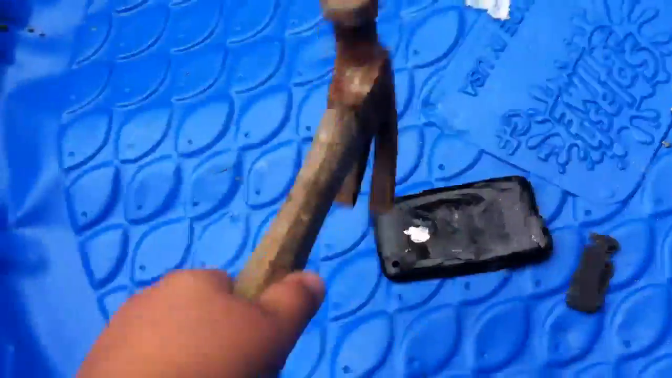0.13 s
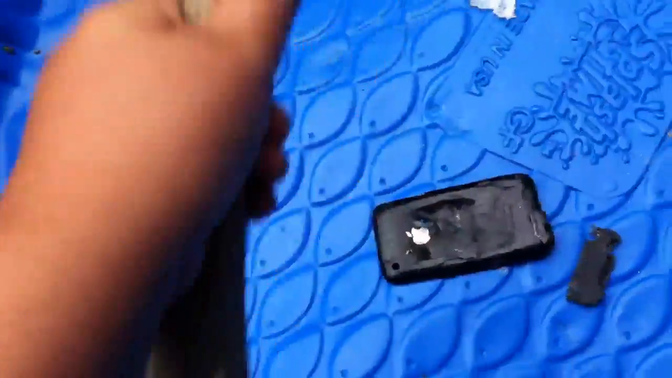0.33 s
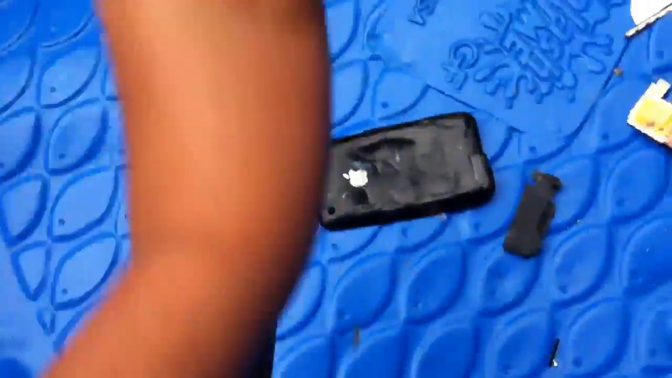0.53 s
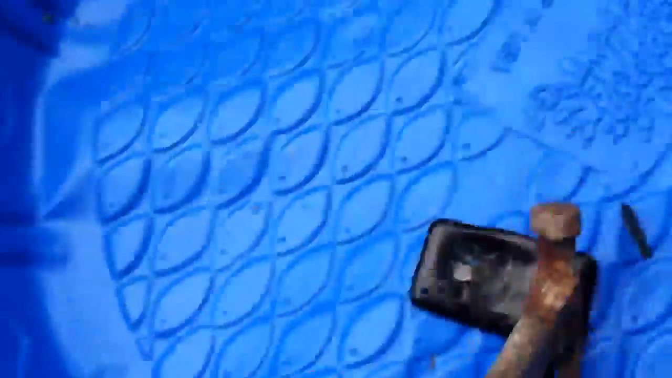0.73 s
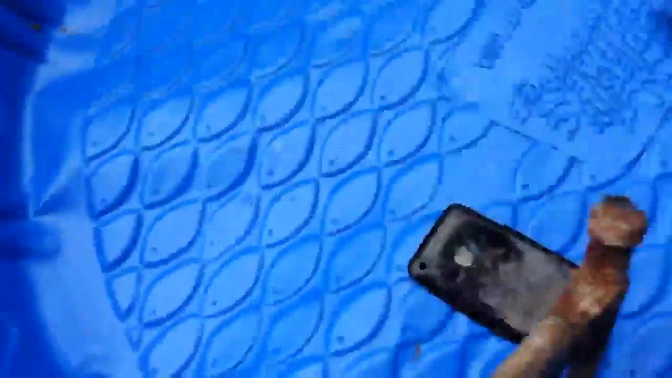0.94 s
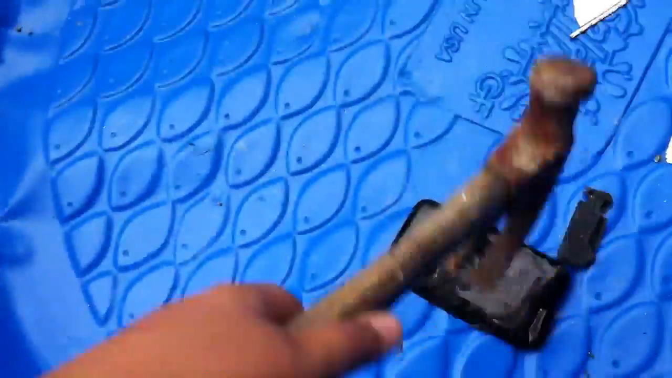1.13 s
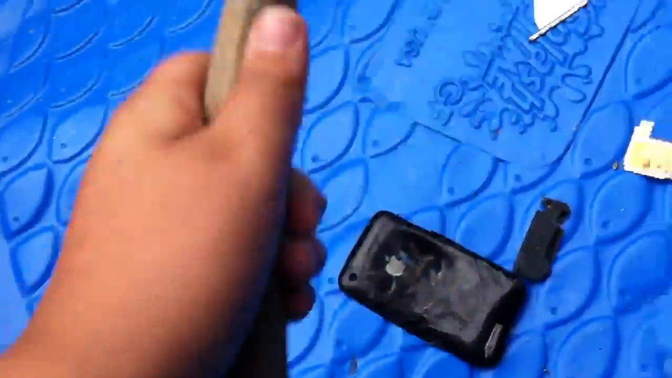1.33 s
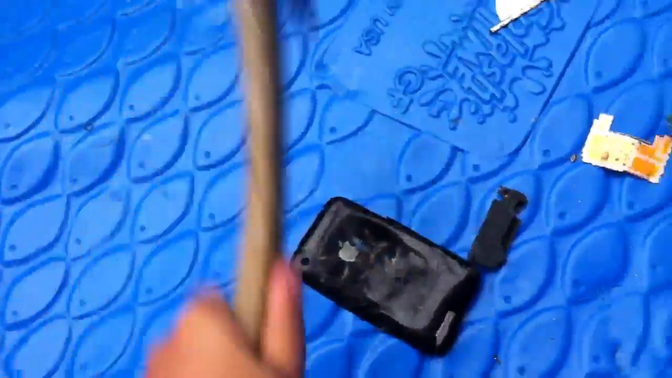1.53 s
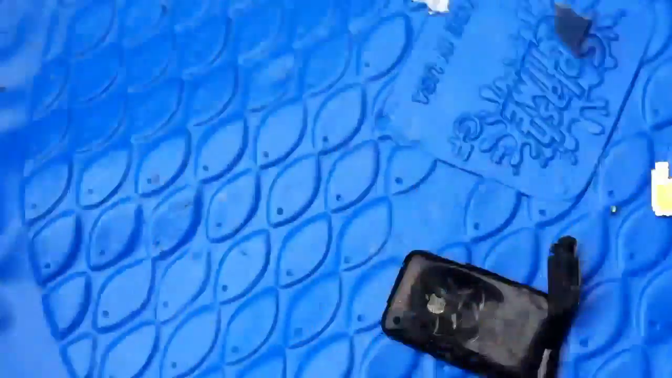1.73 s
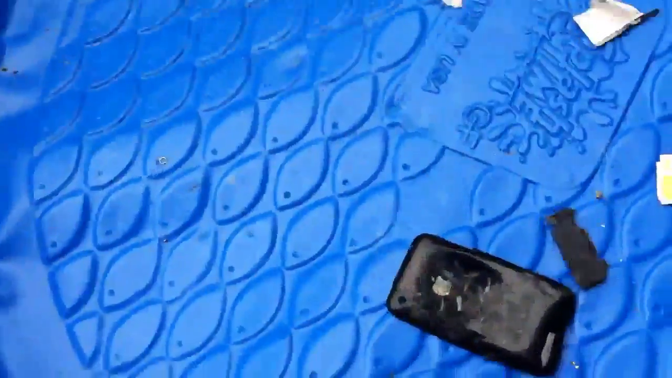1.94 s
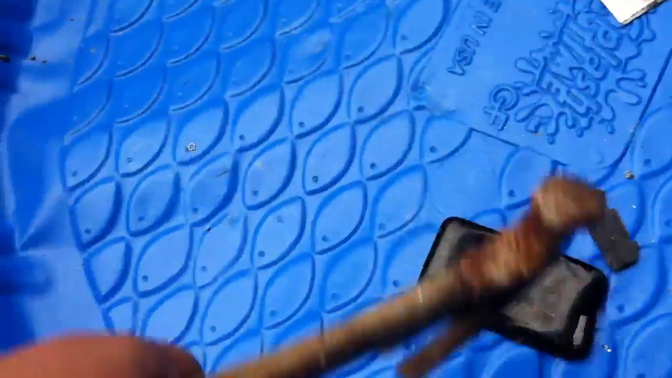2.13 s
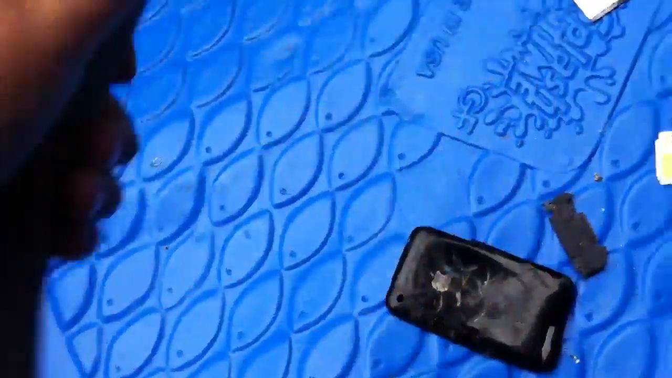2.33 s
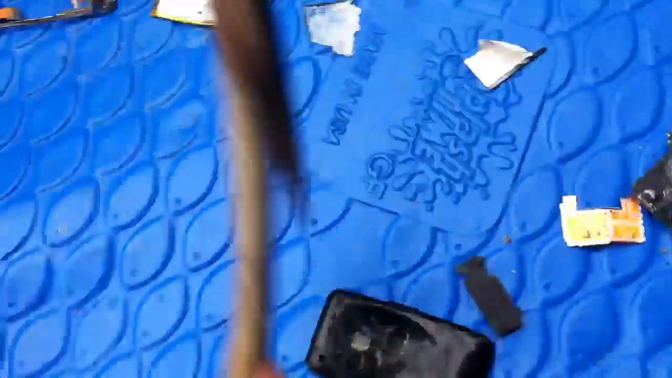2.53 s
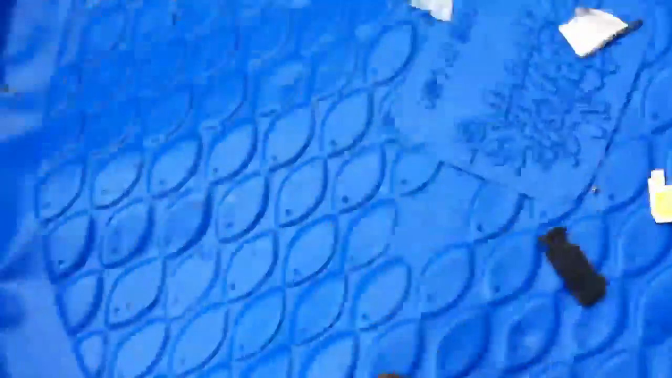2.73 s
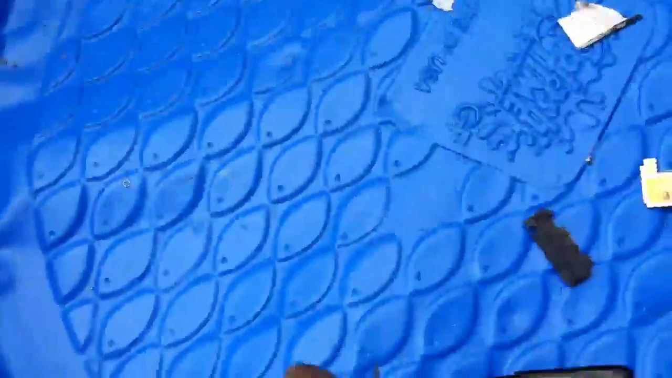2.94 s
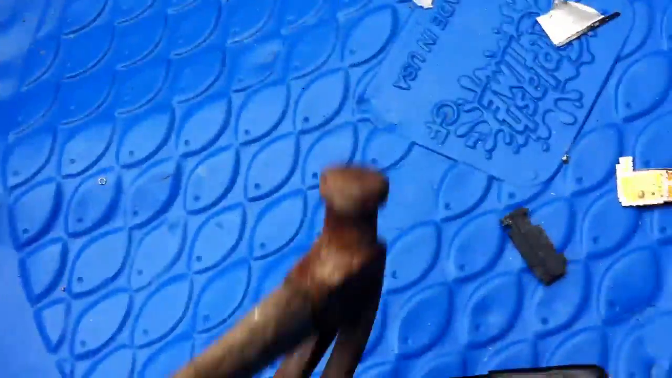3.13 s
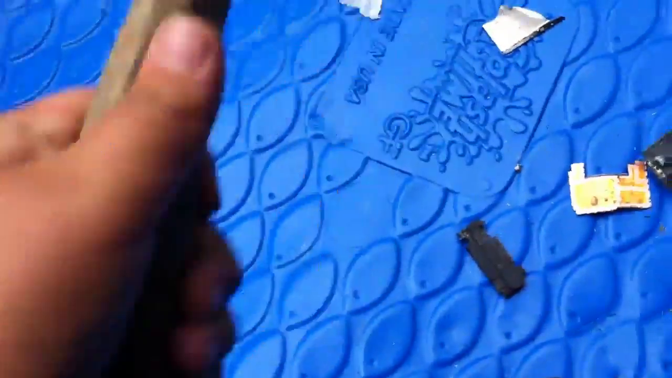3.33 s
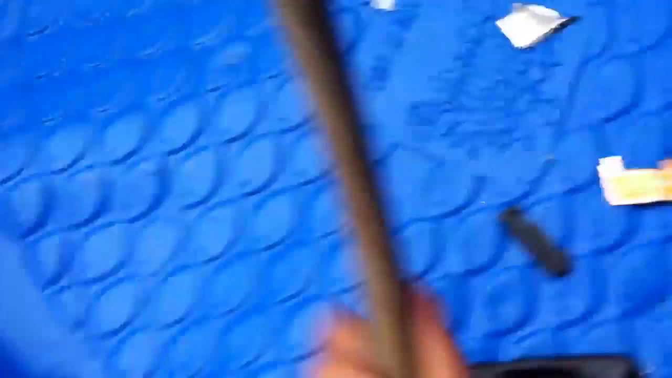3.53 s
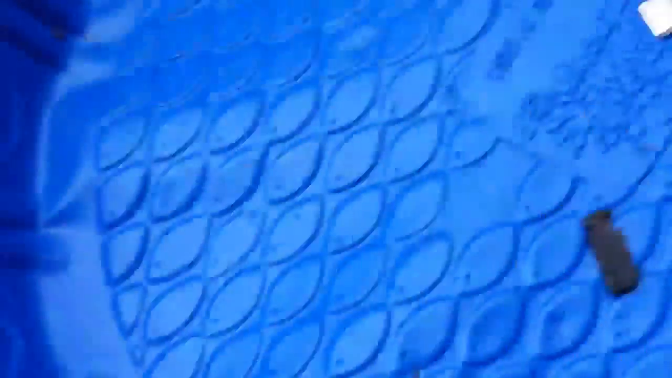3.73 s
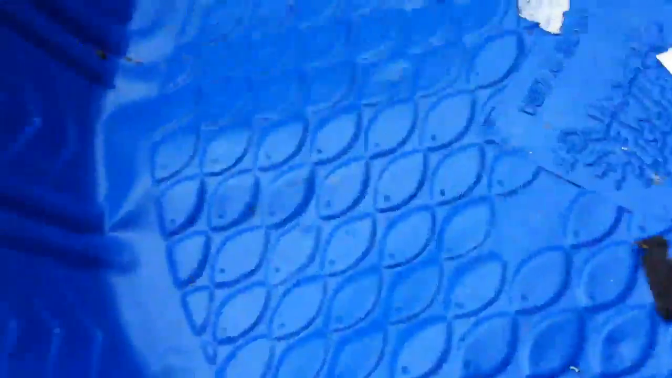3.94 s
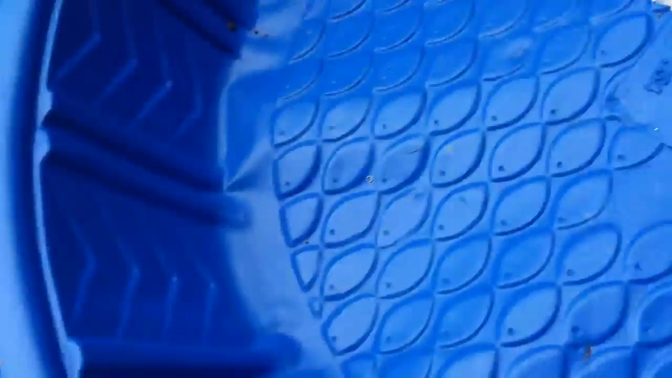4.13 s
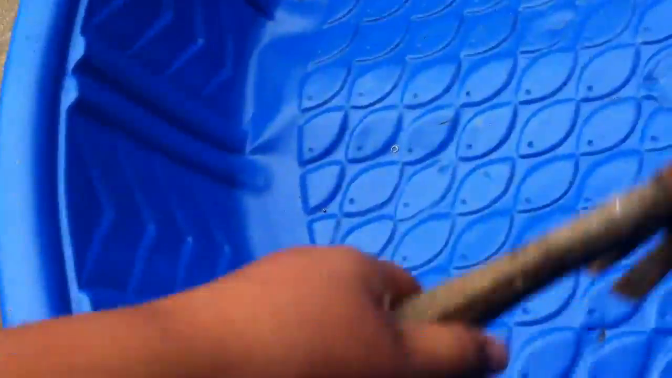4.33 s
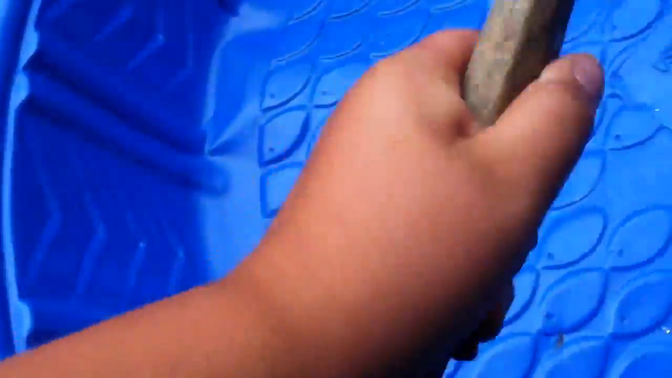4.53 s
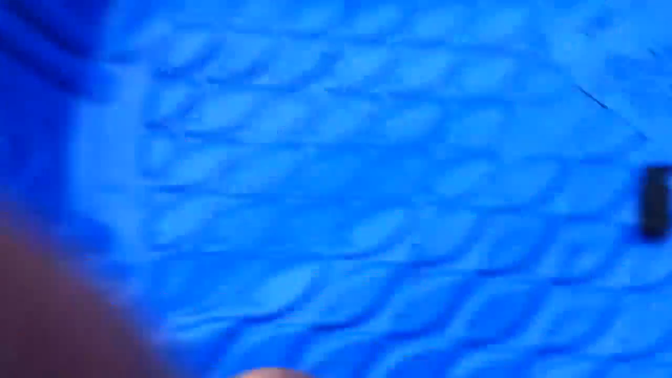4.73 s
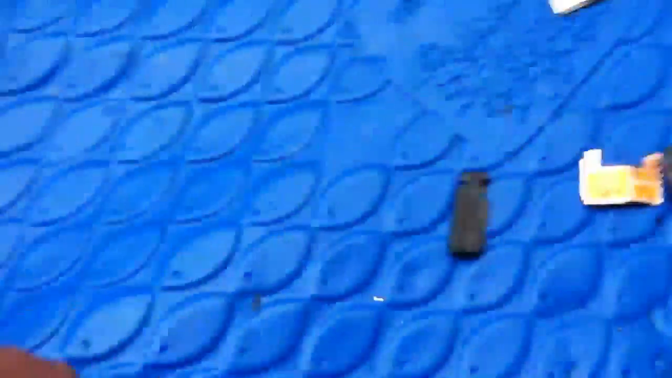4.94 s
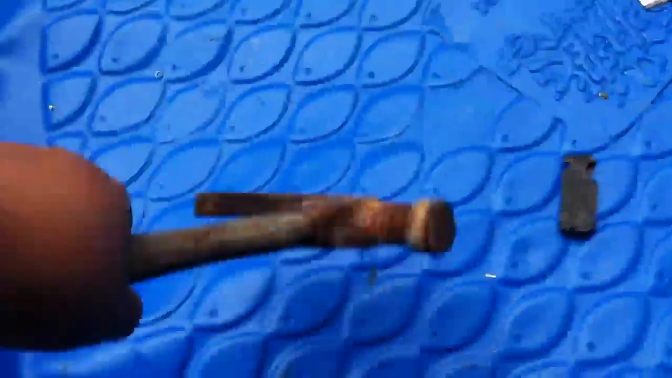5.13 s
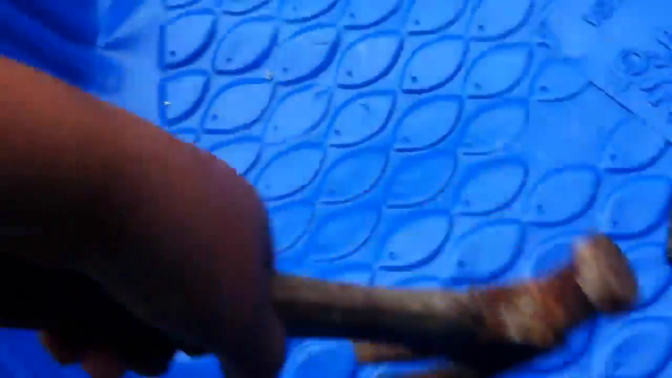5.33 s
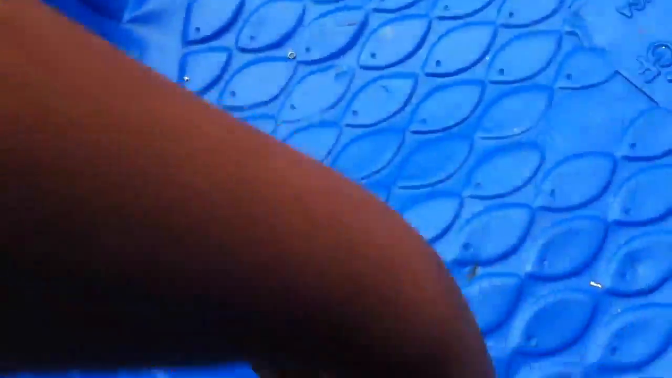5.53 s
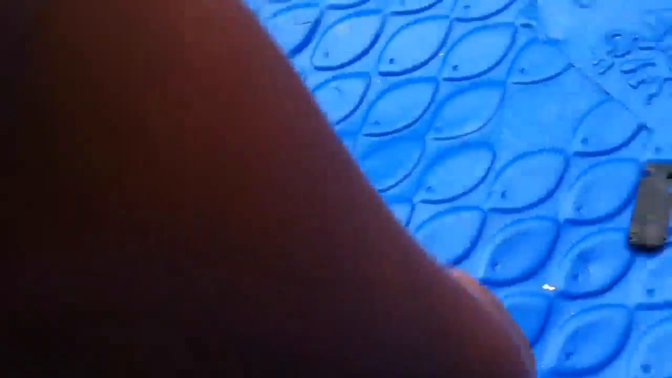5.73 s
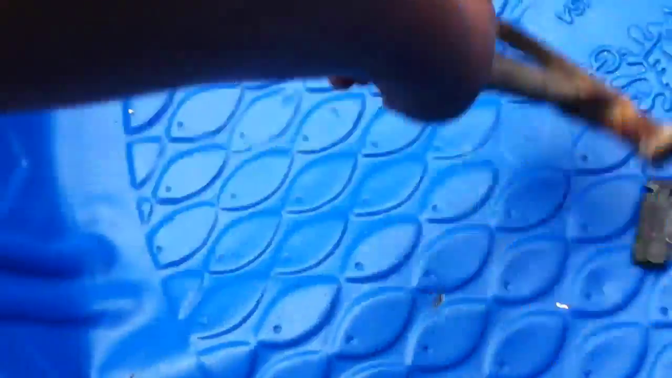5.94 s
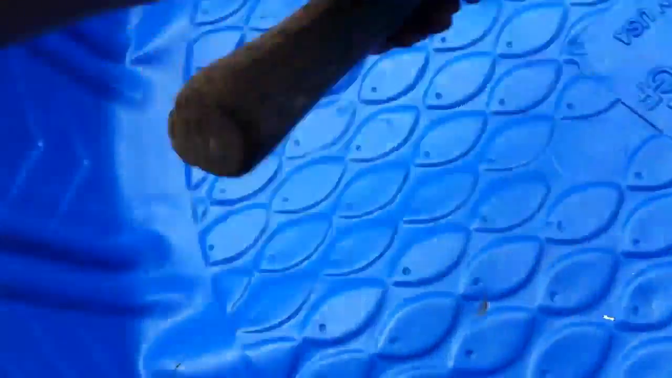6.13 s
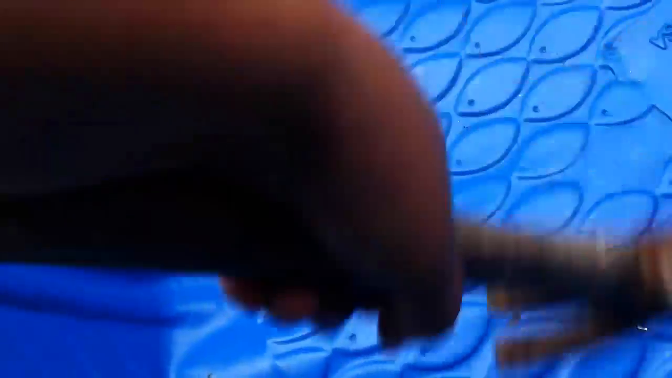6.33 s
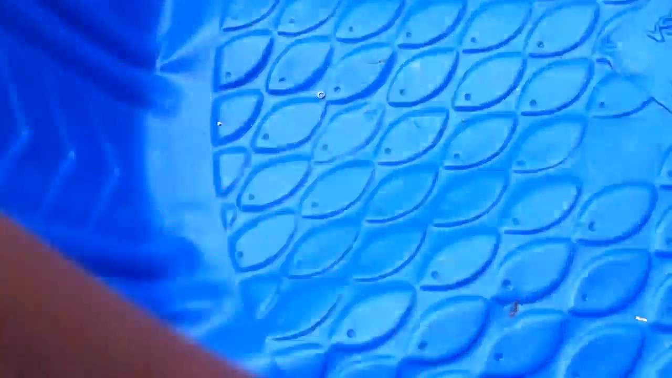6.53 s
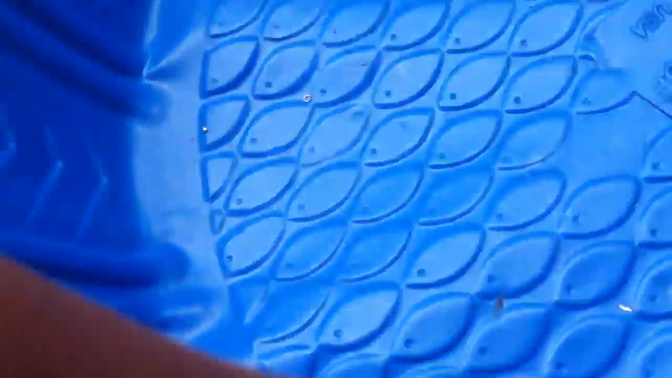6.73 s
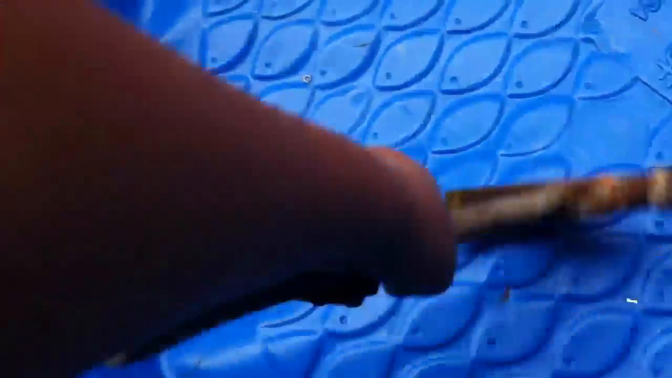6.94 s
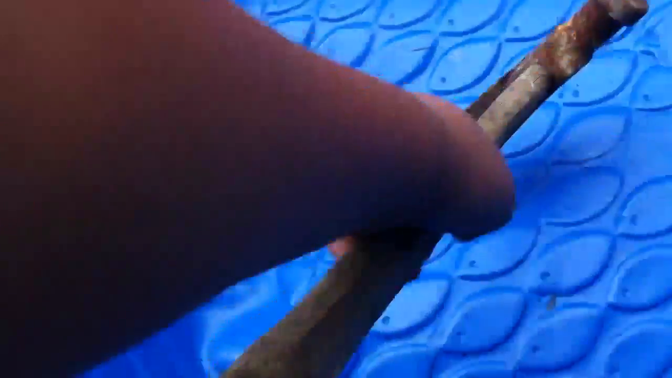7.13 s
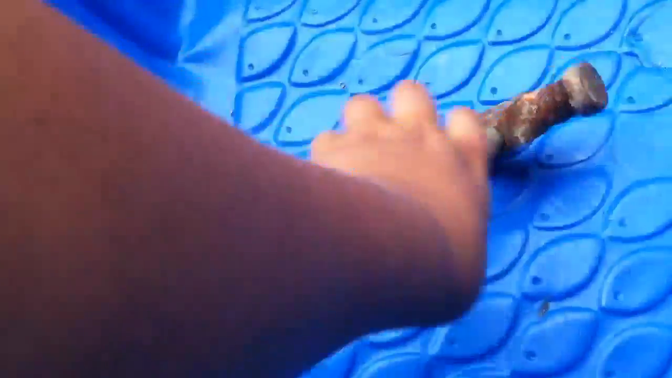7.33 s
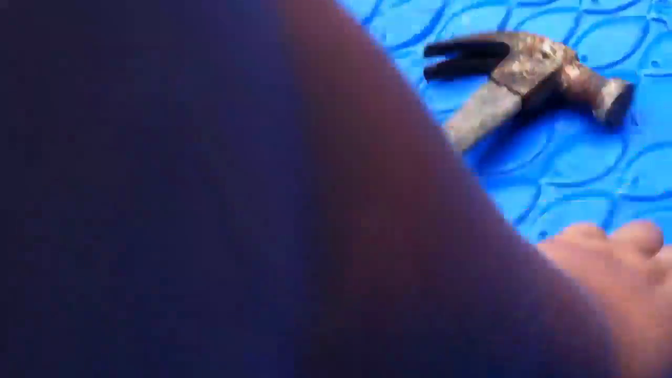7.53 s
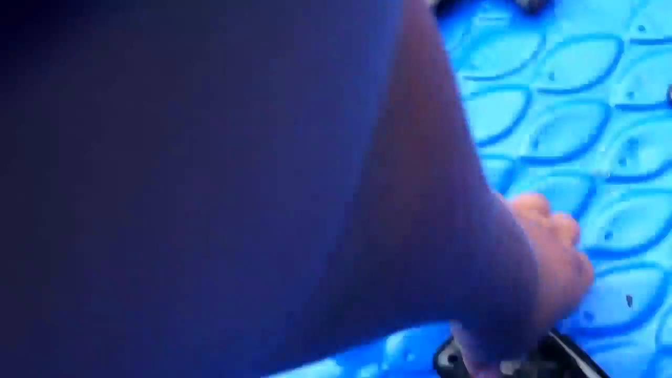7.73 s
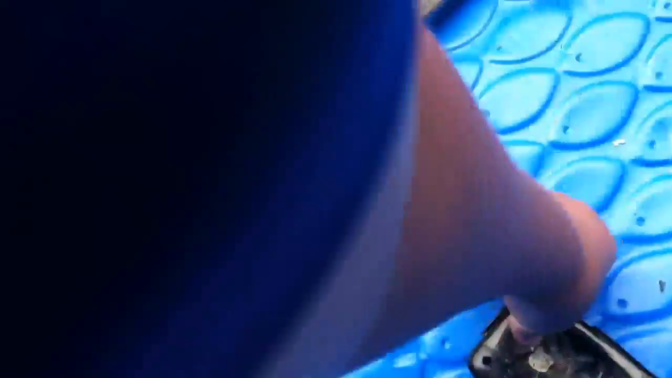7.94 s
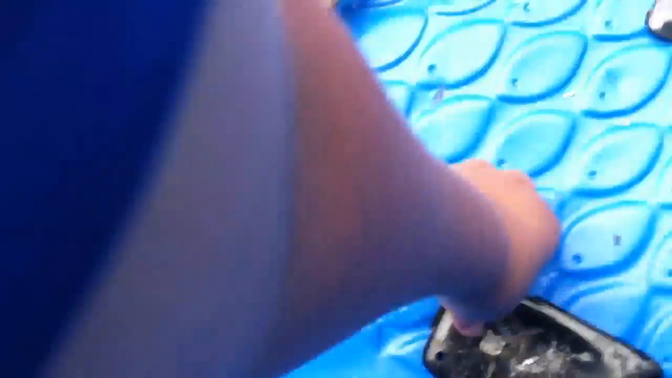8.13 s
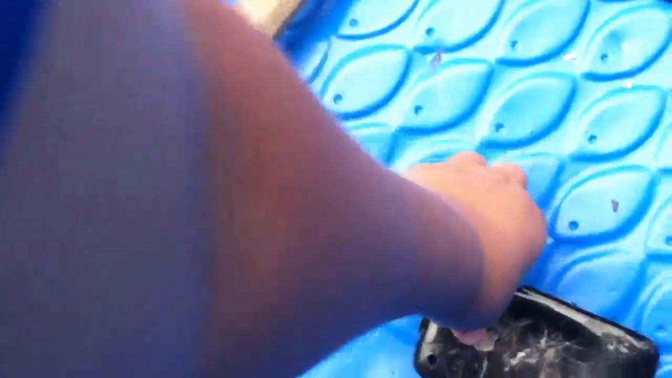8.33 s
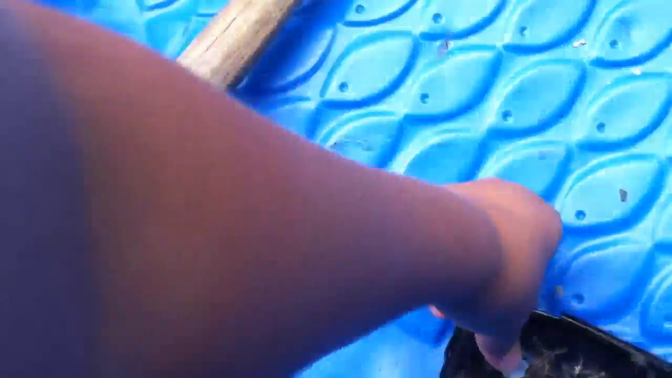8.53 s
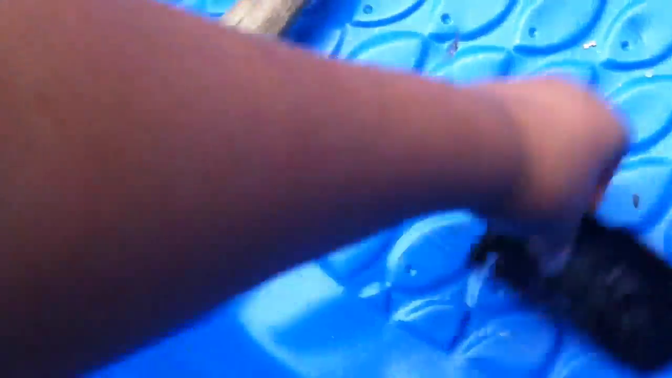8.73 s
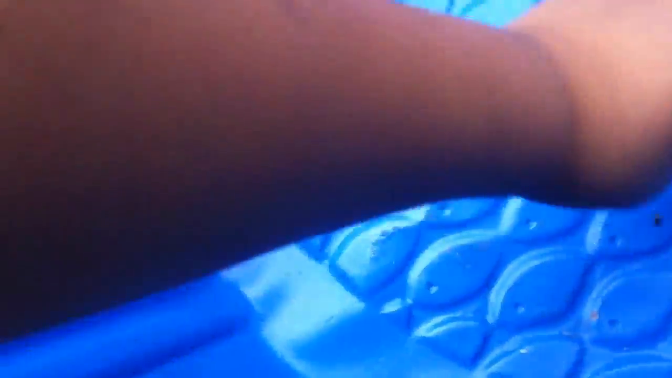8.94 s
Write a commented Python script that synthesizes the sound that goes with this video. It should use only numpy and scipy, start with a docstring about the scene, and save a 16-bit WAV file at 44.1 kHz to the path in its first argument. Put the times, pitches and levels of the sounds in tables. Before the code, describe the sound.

Five close hammer blows crunch glass and casing on hollow plastic, followed by clattering knocks, dragging and a faint squeaky slide.

```python
"""A claw hammer bumps a hard plastic paddling pool, close by, in a soft outdoor hush. In the first
five seconds it smashes a phone on the pool floor five times. Each blow crushes glass and casing, booms
through the thin shell, sets fragments rattling and overloads the microphone. Chips tick down in between,
and two pops and a swish lead into the fourth blow. Then hammer and phone are knocked and dragged over
the ribbed plastic. Last, the phone slides along in three pushes, squeaking on the first."""
import sys
import numpy as np
from scipy import signal
from scipy.fft import rfft, irfft, next_fast_len
from scipy.io import wavfile

SR = 44100
rng = np.random.default_rng(int(sys.argv[2]) if len(sys.argv) > 2 else 0)


def dump(signal):
    """Clip the signal to [-1, 1] and save it as 16-bit WAV at the path in sys.argv[1]."""
    limited = np.clip(np.atleast_2d(signal).T, -1, 1)
    pcm = np.round(limited * 32767).astype(np.int16)
    wavfile.write(sys.argv[1], SR, pcm)


N = 400898
T = np.arange(int(.8 * SR)) / SR  # seconds since the start of one hit

# hammer blows: (time [s], crack [dB], crush time [s], shell boom [dB], thud [dB], casing ring [dB],
# casing pitch [Hz], glass [dB], fine splinters [dB], steel ring [dB])
BLOWS = [(0.7529, -6, 0.013, -13.5, -2, -6.5, 2690, 4.5, -4.5, -32),
         (1.7152, -11.5, .012, -15.5, -0.5, 0, 3006, 3, -6.5, -34),
         (2.718, -8.5, 0.012, -16, -0.5, -3.5, 3366, -5.5, 9, -34),
         (3.7491, -10.5, 0.011, -17, -4, 1, 2970, -3.5, 5.5, -22),
         (4.8699, -9.5, 0.0058, -24, -3, -1.5, 2863, -7.5, 6, -12.5)]
# bumps against the pool: (time [s], level [dB], boom [dB], clack [dB], treble [dB], rebound [dB])
KNOCKS = [(.003, -21.5, -2.5, -21, -4, -4), (.154, -13.5, -15, -7.5, -17, -8.5),
          (0.243, -20, -9.5, -4.5, -11, -10.5), (1.048, -22.5, -8, -18, -14, -4),
          (1.98, -19, -11.5, -13, -20, -2.5), (2.622, -21, -30, -18, -13, -3),
          (2.655, -16.5, -15, -20, -19, -19), (4.09, -25, -13, -16, -39, -6),
          (4.793, -21, -17, -15, -13, -11), (5.195, -15, -34, -9, -12, -8.5), (5.852, -6, -17, -3, -10, 0),
          (5.917, -15, -2.5, -5, -7, -14), (6.725, 0, -10, -9.5, -14.5, -16),
          (6.865, 2.5, -33, -19, -9, -5.5), (6.942, -6.5, -14, -17, -12.5, -7.5),
          (7.381, 6, -11.5, -10.5, -21, -1), (7.466, -0.5, -22, -13, -17, -18),
          (7.572, 8.5, -17.5, -21, -32.5, -9), (7.696, 1, -11, -8, -17, -3.5),
          (7.799, -3.5, -17, -7, -17, -11), (8.401, -14, -14, -20, -22, -8.5),
          (8.673, -17.5, -21, -5, -19, -14), (8.891, -8.5, -27.5, -14, -9.5, -19),
          (8.922, -3.5, -20.5, -9.5, -12.5, -26)]
# shoves of the hammer over the ribs: (time [s], level [dB], hold [s], fade [dB/s])
SHOVES = [(0.0, -23, 0.0022, 114), (5.03, -38, 0.116, 401), (5.189, -32.5, 0.048, 84),
          (5.858, -26, 0.18, 105), (6.725, -20, 0.07, 56), (6.862, -19.5, 0.062, 37.5),
          (7.387, -14.5, 0.018, 63), (7.506, -13, 0.085, 54), (7.683, -14, 0.041, 65.5)]
# pushes of the broken phone: (time of top speed [s], level [dB], build-up [s])
PUSHES = [(8.25, -41.5, 0.13), (8.55, -35.5, 0.045), (8.816, -29.5, 0.064)]
# glass chips landing: (time [s], level [dB], sparkle [dB])
CHIPS = [(.1245, -20, -21), (1.1024, -23, -26.5), (1.2172, -28, -35), (1.932, -22, -17.5),
         (3.0684, -34.5, -11), (3.871, -30.5, -2), (4.1528, -43.5, -1), (5.0605, -43, 4),
         (7.4679, -10, -56), (8.0847, -23, -45)]
# dry pops: (time [s], level [dB], fade time [s]); a fade time, or t60, is the time to drop by 60 dB
POPS = [(3.671, -13.5, 0.019), (3.742, -7.5, 0.0089)]
# recorded level of the hush, set by the recorder's gain recovering after blows: (time [s], level [dB])
RECORDED_HUSH_LEVELS = [(0, -50), (2.2, -49.5), (3.4, -45.5), (4.2, -52), (4.8, -45), (5.45, -45.5),
                        (6.3, -42.5), (8.199, -40), (9.1, -41.5)]

# tone colours, or how strong the lows and highs are: (frequency [Hz], level [dB])
CRACK_COLOUR = [(24, -61.5), (40, -45), (305, -0.5), (663, -3.5), (810, -2.5), (1180, -6), (1630, -3.5),
                (1760, -5.5), (2100, -4), (3300, -7.5), (3930, -11.5), (5580, -14.5), (7000, -11.5),
                (14100, -41), (16000, -34.5)]  # the phone breaking
SHELL_COLOUR = [(35, -69), (60, -48), (100, -12.5), (133, -14), (172, -1), (281, 4.5), (398, -6.5),
                (621, -5.5), (1090, -13.5), (2250, -15.5), (2900, -13.5), (4970, -26.5), (7750, -29),
                (14900, -50.5), (16000, -39)]  # the pool's thin shell buzzing
GLASS_COLOUR = [(300, -16), (2000, 2.5), (4000, 0.5), (7000, 3), (10000, -6.5), (16000, -26.5)]  # loose bits of glass
BUMP_COLOUR = [(41, -68), (70, -25), (336, 7), (566, -2.5), (744, -0.5), (1410, -7), (1580, -11),
               (2020, -8.5), (2220, -10), (2540, -8), (3820, -14.5), (7390, -19), (16000, -62.5)]  # a knock on plastic
RUB_COLOUR = [(35, -66), (60, -34), (81, -25), (110, -10), (202, 2.5), (315, 2.5), (553, -7), (767, -8.5),
              (862, -9), (946, 0.5), (1090, -10), (2520, -14.5), (3760, -19), (7400, -27), (16000, -65.5)]  # the hammer rubbing the floor
GROOVE_COLOUR = [(900, 0), (2500, -6), (8000, -12)]  # rounded ribs dulling a bump
SCRAPE_COLOUR = [(59, -42), (100, -28), (151, -28), (523, -17), (617, -1), (791, -9.5), (972, -1.5),
                 (1200, -14), (1850, -10), (2130, -12), (2320, -10), (2910, -22.5), (3890, -20.5),
                 (5640, -14), (14000, -51)]  # the phone's rim scraping
HUSH_COLOUR = [(15, -71.5), (25, -40.5), (49, -12.5), (180, -3), (212, 0), (373, -5), (476, -10), (591, -6),
               (1440, -10), (1610, -8.5), (1940, -9), (3430, -12.5), (9320, -32.5), (13200, -57.5),
               (16000, -54)]  # outdoor air

# notes that ring after a hit: (frequency [Hz], level [dB], fade time [s])
POOL_NOTES = [(121.6, -8, 0.89), (148.5, 0, 0.7), (180.2, -4.5, 0.7), (291.6, 6, 0.39), (329, -2.5, 1),
              (614, 3, 0.29), (733, 3.5, 0.086)]  # the hollow shell
STEEL_NOTES = [(2525, -18.5, .2), (2890, -7, .15), (4510, -11, .12), (4890, -1.5, 0.18), (4960, -5.5, .1),
               (5060, -11.5, .08)]  # the hammer head on the phone's frame

# resonances, the pitches a part likes to shake at: (frequency [Hz], width [Hz], level [dB])
CASING_PEAKS = [(1860, 64, -17), (2290, 20, 3), (2560, 40, -10.5)]  # the phone's casing
FLOOR_PEAKS = [(596, 18, 1.5), (935, 35, 10.5), (1185, 35, -4.5), (1325, 54, 8), (3104, 78, -7.5)]  # the ribbed floor near the contact
BACK_PEAKS = [(965, 92, -1.0), (1580, 170, -20.5), (2120, 136, -6.5), (2880, 170, 7.5)]  # phone's back

# how long the lows and highs of a crack, boom or bump last: (frequency [Hz], fade time [s])
CRACK_FADES = [(60, 0.13), (300, 0.3), (1000, 0.16), (3000, 0.15), (7000, 0.11), (14000, .055)]
SHELL_FADES = [(100, 0.42), (300, 0.71), (1000, 0.74), (3000, 0.74), (10000, 0.81)]
BUMP_FADES = [(120, 0.46), (400, 0.19), (1500, 0.092), (5000, 0.097), (14000, .055)]

RATTLE_DB, RATTLE_FADE_S = -30, 1.05
REBOUND_S = .023
SQUEAK_S, SQUEAK_HZ, SQUEAK_SAG_HZ_PER_S, SQUEAK_WAVER_HZ = 8.29, 3880, 2800, 140
TOP_HZ = 16000


def blows():
    """The hammer crushes the phone, the shell booms and loose fragments dance on it."""
    out = np.zeros(N)
    for s, db, crush_s, boom_db, thud_db, casing_db, casing_hz, glass_db, splinter_db, steel_db in BLOWS:
        fractures = grit(len(T), per_s=2800, spread_db=4.0, t60=0.0045)
        crack = dying(unit(coloured(fractures, CRACK_COLOUR)), CRACK_FADES, hold=crush_s, rise=0.012)
        # the casing rings at a new pitch as it breaks up
        casing = unit(resonate(fractures, CASING_PEAKS + [(casing_hz, 150, 0)]))
        casing *= amp(casing_db - 60 * np.maximum(T - crush_s, 0) / .085) * (1 - np.exp(-T / 0.0013))
        # the flexing floor buzzes against the phone and the ground
        slaps = grit(len(T), per_s=540, spread_db=-4.5, t60=0.036)
        buzz = unit(coloured(slaps, SHELL_COLOUR)) + amp(-12) * unit(resonate(slaps, FLOOR_PEAKS))
        boom = dying(buzz, SHELL_FADES, hold=0.0091, rise=.012)
        boom += amp(-9) * ring(POOL_NOTES, attack=0.0074)
        fragments = unit(coloured(grit(len(T), per_s=70, spread_db=5, t60=.014), GLASS_COLOUR))
        rattle = amp(RATTLE_DB - 60 * T / RATTLE_FADE_S) * fragments
        # breaking is most violent while the head is still sinking in
        violence = 1 + amp(-2) * np.exp(-(T / crush_s) ** 4)
        smash = amp(db) * (violence * (crack + casing) + rattle) + amp(boom_db) * boom
        colour = [(250, thud_db), (600, 0.0092), (3500, 0.0016),
                  (6500, glass_db), (8000, glass_db), (12000, splinter_db)]
        add(out, s, coloured(smash, colour))
        add(out, s, amp(steel_db) * ring(STEEL_NOTES, attack=.02))
    return out


def knocks():
    """Lighter hits: a plastic clack with the hollow ring of the shell, and a quick rebound."""
    out = np.zeros(N)
    for s, db, boom_db, clack_db, treble_db, rebound_db in KNOCKS:
        colour = [(350, boom_db + 7), (1100, 0), (2500, 0), (6000, treble_db + 14)]
        for delay, loss_db in [(0, 0), (REBOUND_S, rebound_db)]:
            chatter = rng.standard_normal(len(T))
            bump = coloured(unit(coloured(chatter, BUMP_COLOUR)), colour)
            clack = amp(clack_db + 4.5) * unit(resonate(chatter, FLOOR_PEAKS))
            strike = dying(bump + clack, BUMP_FADES, hold=.001, rise=0.0012)
            hollow = amp(boom_db - 6.5) * ring(POOL_NOTES, attack=0.0051)
            add(out, s + delay, amp(db + loss_db - 11) * (strike + hollow))
    return out


def drags():
    """The hammer catches and slips on the ribs, shaking the shell and grinding crumbs of glass."""
    force = np.linalg.norm([shove(*row) for row in SHOVES], axis=0)
    slips = grit(N, per_s=340, spread_db=2, t60=0.066)
    floor = amp(-2.5) * unit(coloured(slips, RUB_COLOUR))
    floor += amp(-10.5) * unit(resonate(slips, FLOOR_PEAKS))
    drops = grit(N, per_s=30, spread_db=3.5, t60=.08)  # the head drops into grooves
    bumps = unit(coloured(coloured(drops, BUMP_COLOUR), GROOVE_COLOUR))
    crumbs = unit(coloured(grit(N, per_s=100, spread_db=8.5, t60=0.013), GLASS_COLOUR))
    return force * (floor + amp(-7) * bumps + amp(-28) * crumbs)


def pops():
    """Each pop is a sharp tick with a short low thump."""
    out = np.zeros(N)
    for s, db, t60 in POPS:
        tick = rng.standard_normal(len(T)) * amp(-2.5 - 60 * T / 0.0037)
        thump = ring([(221, 2.3, t60), (450, -1.0, t60)], attack=0.00095)
        add(out, s, amp(db) * (tick + thump))
    return out


def chips():
    """Bits of glass fall back and tick on the plastic."""
    out = np.zeros(N)
    for s, db, sparkle_db in CHIPS:
        tick = unit(coloured(rng.standard_normal(len(T)), GLASS_COLOUR))
        tick = coloured(tick, [(7000, 0), (12000, sparkle_db + 25)])
        fade = amp(-60 * T / 0.0075) + amp(-8.5 - 60 * T / 0.079)  # a snap, then a softer tail
        add(out, s, amp(db - 7) * tick * fade)
    return out


def slide():
    """The phone's rim rasps finely on the plastic and its hollow back rings along."""
    speed = sum(push(*row) for row in PUSHES)
    rasp = grit(N, per_s=500, spread_db=0, t60=0.023)
    rim = amp(-3) * unit(coloured(rasp, SCRAPE_COLOUR))
    back = amp(-6) * unit(resonate(rasp, BACK_PEAKS))
    return speed * (rim + back)


def swish():
    """A short high hiss that swells into the fourth blow."""
    colour = [(2000, -2), (4800, 2), (6000, -5), (7800, -3), (11000, -34)]
    hiss = unit(coloured(rng.standard_normal(N), colour))
    return push(s=3.74, db=-33.5, build_up_s=0.045) * hiss


def squeak():
    """Smooth plastic sticks and slips, making a thin, unsteady note that sinks."""
    waver = unit(filtered(rng.standard_normal(N), lambda hz: hz < 200))
    hz = SQUEAK_HZ - SQUEAK_SAG_HZ_PER_S * (np.arange(N) / SR - SQUEAK_S) + SQUEAK_WAVER_HZ * waver
    note = unit(np.sin(2 * np.pi * np.cumsum(hz) / SR))
    return push(SQUEAK_S, db=-41.5, build_up_s=0.12) * note


def air():
    """A soft background hush whose recorded level dips after loud blows and creeps back up."""
    s, db = np.transpose(RECORDED_HUSH_LEVELS)
    hush = unit(coloured(rng.standard_normal(N), HUSH_COLOUR))
    return amp(np.interp(np.arange(N) / SR, s, db)) * hush


def shove(s, db, hold, fade_db_per_s, attack_s=0.0017):
    """The force of one shove: it bites at once, holds, then eases off."""
    t = np.maximum(np.arange(N) / SR - s, 0)
    return amp(db - fade_db_per_s * np.maximum(t - hold, 0)) * (1 - np.exp(-t / attack_s))


def push(s, db, build_up_s, stop_s=0.07):
    """The speed of one hand movement: it builds up until time s, then comes to rest."""
    t = np.arange(N) / SR - s
    return amp(db) * np.exp(-(t / np.where(t < 0, build_up_s, stop_s)) ** 2)


def grit(size, per_s, spread_db, t60):
    """A stream of tiny random contacts, each a short puff of noise."""
    hits = rng.random(size) < per_s / SR
    contacts = hits * amp(spread_db * np.clip(rng.standard_normal(size), -2, 2))
    power = signal.lfilter([1], [1, -amp(-120 / (t60 * SR))], contacts ** 2)  # each gets a fading tail
    return unit(np.sqrt(power) * rng.standard_normal(size))


def dying(x, fade_times, hold, rise):
    """Each octave swells, holds and dies at its own speed; slow bending waves make the bass come late."""
    centres = np.geomspace(60, 15360, 9)
    band_shapes = [np.c_[centres, weights] for weights in np.eye(len(centres))]
    bands = filtered(x, lambda hz: np.array([along(shape, hz) for shape in band_shapes]))
    fade = amp(-60 * np.maximum(T - hold, 0) / along(fade_times, centres)[:, None])
    swell = 1 - np.exp(-T / (rise * np.sqrt(centres[0] / centres[:, None])))
    return np.sum(bands * fade * swell, axis=0)


def ring(notes, attack):
    """The fading notes of a struck object, with slightly new strengths every time."""
    hz, db, t60 = np.transpose(notes)[:, :, None]
    strength = amp(db + 2 * rng.standard_normal(hz.shape) - 60 * T / t60)
    waves = np.sin(2 * np.pi * (hz * T + rng.random(hz.shape)))
    return np.sum(strength * waves, axis=0) * (1 - np.exp(-T / attack))


def resonate(x, peaks):
    """Shake an object with x: the pitches near its resonances come through."""
    return filtered(x, lambda hz: sum(
        (-1) ** k * amp(db) * 1j * hz * width / (centre ** 2 - hz ** 2 + 1j * hz * width)
        for k, (centre, width, db) in enumerate(peaks)))


def coloured(x, colour):
    """Shape x with (frequency [Hz], level [dB]) points."""
    return filtered(x, lambda hz: amp(along(colour, hz)))


def filtered(x, response):
    """Multiply each frequency in x by response(hz)."""
    size = next_fast_len(len(x) + 4096)
    return irfft(rfft(x, size) * response(np.fft.rfftfreq(size, 1 / SR)), size)[..., :len(x)]


def along(points, hz):
    """Read between (frequency [Hz], value) points on a log frequency scale."""
    frequencies, values = np.transpose(points)
    return np.interp(np.log(hz + 1), np.log(frequencies + 1), values)


def add(track, s, sound):
    """Mix a sound into the track at time s."""
    part = track[max(round(s * SR), 0):]
    part[:len(sound)] += sound[:len(part)]


def amp(db):
    """Turn decibels into a multiplier."""
    return 10 ** (np.asarray(db) / 20)


def unit(x):
    """Scale x to an average strength (rms) of 1."""
    return x / np.sqrt(np.mean(x ** 2) + 1e-20)


def scene():
    """All the sounds together in one channel."""
    return (blows() + knocks() + chips() + pops() + drags() + slide() + squeak() + swish() + air())[None]


def record(dry):
    """The small microphone loses deep bass and the highest treble, and squashes the loudest peaks."""
    x = coloured(dry[0], [(30, -19.0), (80, -8.5), (115, -0.5), (12000, -0.5), (16000, -6.5)])
    squashed = x / (1 + np.abs(x) ** 5) ** (1 / 5)
    return filtered(squashed, lambda hz: hz < TOP_HZ)[None]


dry = scene()
out = record(dry)
dump(out)
```